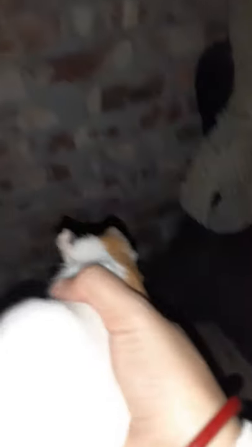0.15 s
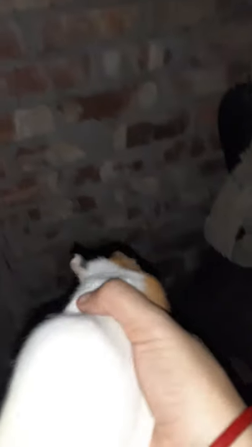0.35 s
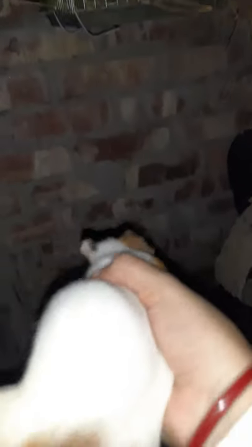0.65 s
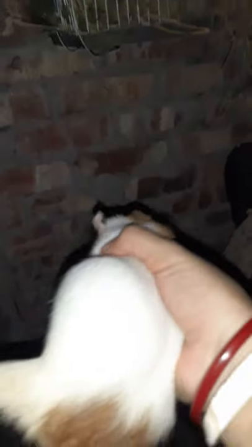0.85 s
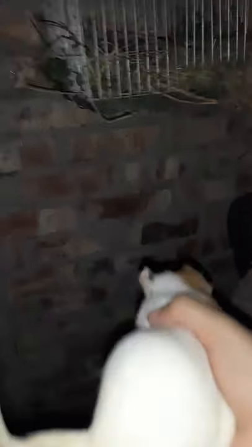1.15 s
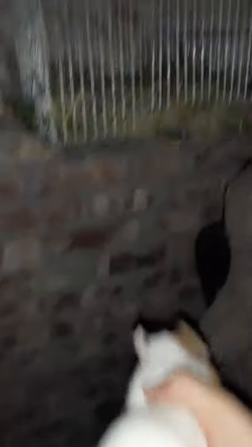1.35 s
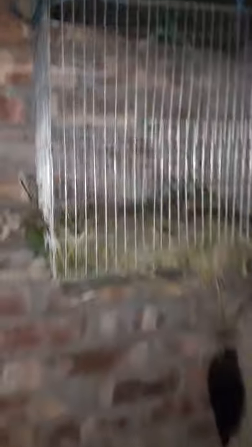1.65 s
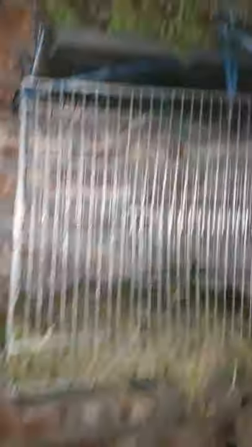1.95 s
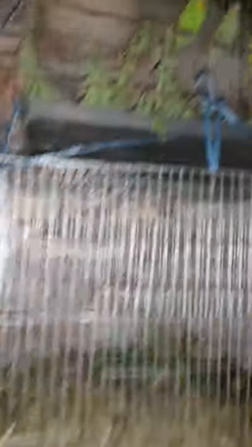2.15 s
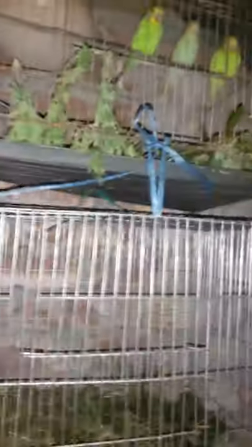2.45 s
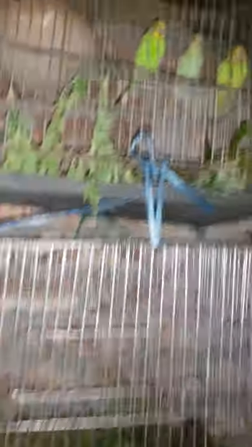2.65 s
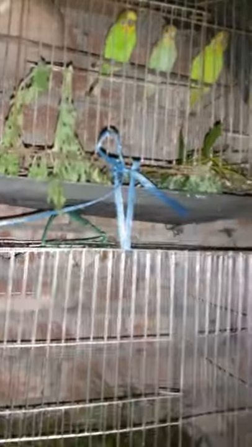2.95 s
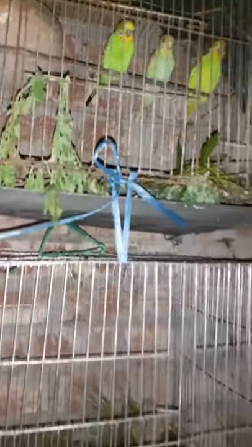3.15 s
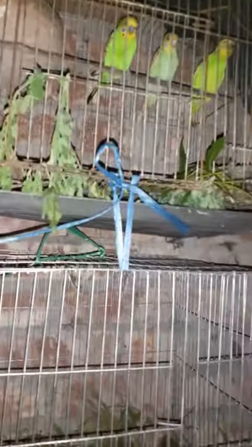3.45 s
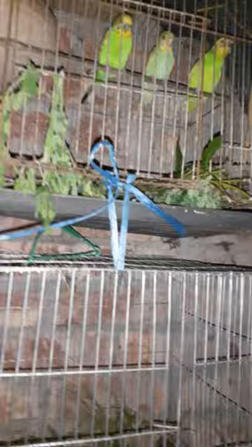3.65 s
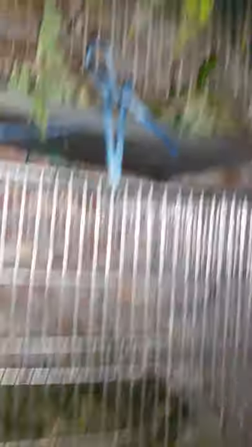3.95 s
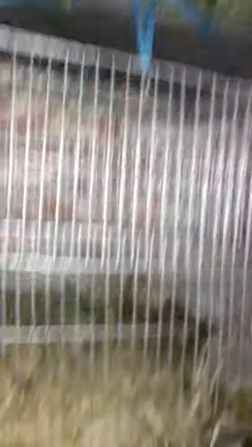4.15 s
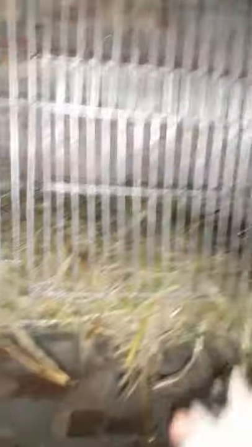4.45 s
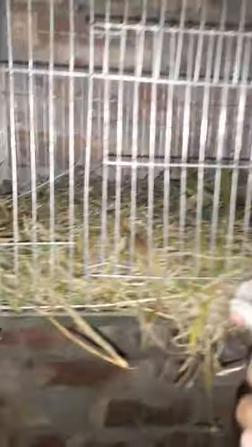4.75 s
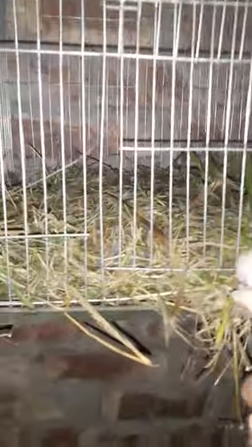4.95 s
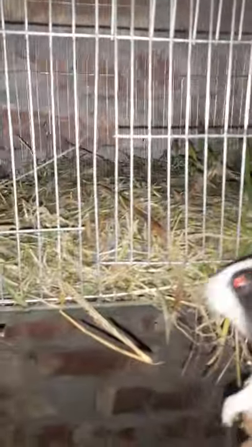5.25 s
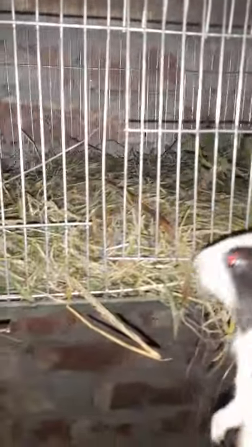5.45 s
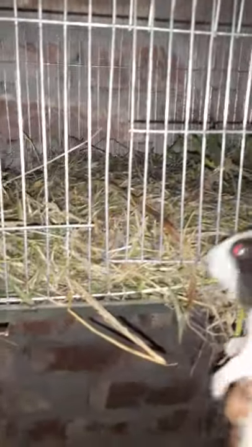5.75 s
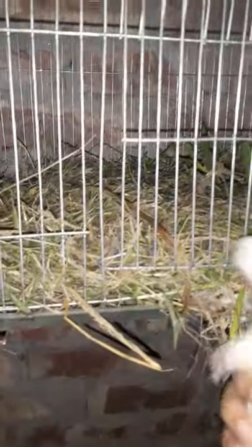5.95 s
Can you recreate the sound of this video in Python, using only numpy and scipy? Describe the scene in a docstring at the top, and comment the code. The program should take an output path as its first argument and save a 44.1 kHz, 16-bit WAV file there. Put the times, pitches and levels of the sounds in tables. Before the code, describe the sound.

A guinea pig very close to a phone in a small brick room gives several loud, piercing squeals, some rough and splitting. It then calms to regular soft calls, each a low grunt flicking up into a thin whistle. A faint motor-like hum drops in pitch midway. Soft handling thuds and small rustles follow, a fainter call comes from farther off, and a hard squeal ends it.

```python
"""A guinea pig, held in a hand close to a phone with two microphones in a small brick room, squeals,
calms to softer calls and squeals again near the end. Most calls open with a low grunt, a pulsed note that
dips and shoots up into a whistle of a few harmonics with air hiss; hard squeals split into subharmonics.
Behind it a faint hum of steady partials sags in pitch over dull room noise and an early drone. Sine thuds
are soft handling bumps, grainy noise is a little rustling, and one call from farther off comes via the room."""
import sys
import numpy as np
from scipy import signal
from scipy.fft import rfft, irfft, next_fast_len
from scipy.io import wavfile
from scipy.ndimage import uniform_filter1d, minimum_filter1d

SR = 44100
rng = np.random.default_rng(int(sys.argv[2]) if len(sys.argv) > 2 else 0)


def output_pcm(signal):
    """Save a mono or channel-first signal as 16-bit PCM at the path in sys.argv[1].

    Samples are clipped to [-1, 1] before scaling.
    """
    pcm = np.clip(np.atleast_2d(signal).T, -1, 1) * 32767
    wavfile.write(sys.argv[1], SR, np.round(pcm).astype(np.int16))


N = 269451
TIME = np.arange(N) / SR


def amp(db):
    """Decibels to gain."""
    return 10 ** (np.asarray(db) / 20)


def unit(x):
    """Scales to rms 1."""
    return x / np.sqrt(np.mean(x ** 2) + 1e-20)


def read(points, hz):
    """Reads a spectrum on a log-frequency axis."""
    f, value = np.transpose(points)
    return np.interp(np.log(hz + 1), np.log(f + 1), value)


def colour(x, gain):
    """Filters x by a gain given as a function of frequency."""
    size = next_fast_len(x.shape[-1] + 2048)
    spectrum = rfft(x, size) * gain(np.fft.rfftfreq(size, 1 / SR))
    return irfft(spectrum, size)[..., :x.shape[-1]]


def noise(spectrum, count):
    """Noise of rms 1 with the given spectrum."""
    return unit(colour(rng.standard_normal(count), lambda f: amp(read(spectrum, f))))


def wobble(count, hz):
    """Slow chance of rms 1, up to about hz."""
    return unit(colour(rng.standard_normal(count), lambda f: np.exp(-(f / hz) ** 2)))


def gate(t, start, end, rise, fall):
    """Smooth opening and closing of a sound."""
    opening = np.minimum((t - start) / rise, (end - t) / fall)
    return np.sin(np.pi / 2 * np.clip(opening, 0, 1)) ** 2


def add(mix, s, sound):
    """Adds a sound into the mix at time s."""
    part = mix[max(round(s * SR), 0):][:len(sound)]
    part += sound[:len(part)]


def partial(hz, k):
    """Harmonic k of a pitch curve as a sine of rms 1, fading out between 16.5 and 18 kHz."""
    audible = np.clip((18000 - k * hz) / 1500, 0, 1)
    phase = k * np.cumsum(hz) / SR + rng.random()
    return np.sqrt(2) * np.sin(2 * np.pi * phase) * audible


# Partials of the hum. Each row: multiple of the pitch, relative level in dB.
HUM_PARTIALS = [(1, -2.5), (1.5, -19), (2, -23.5), (3, -25.5)]
# Colour of the early drone. Each row: frequency in Hz, relative level in dB.
DRONE_COLOUR = [(150, -34), (270, -9), (330, -6), (400, -12.5), (700, -31)]
# Colour of the room noise. Each row: frequency in Hz, relative level in dB per Hz.
ROOM_NOISE_COLOUR = [(15, -35.5), (25, -14.5), (55, -8), (100, -3), (130, -0.5), (160, -14), (320, -17),
                     (450, -20.5), (800, -24), (1600, -28.5), (3200, -34.5), (4300, -42.5), (6000, -44.5),
                     (16000, -65.5)]
# Likeness of the room noise at both microphones. Each row: frequency in Hz, left-right likeness.
ROOM_NOISE_LIKENESS = [(30, 0.98), (200, 0.75), (600, 0.89), (1500, 0.14), (15000, .1)]
HUM_FAST_HZ, HUM_SLOW_HZ = 124.4, 93.6
HUM_FAST_DB, HUM_SLOW_DB = -52.5, -46
HUM_SLOWS_AT_S, HUM_SLOWING_S = 3.42, .26
DRONE_DB, DRONE_END_S, DRONE_RISE_S, DRONE_FADE_S = -59, 2.6, 0.54, 1
ROOM_NOISE_DB = -53.5


def background():
    """A distant motor-like hum that slows and grows midway, over dull room noise and a low drone."""
    slowed = np.clip((TIME - HUM_SLOWS_AT_S) / HUM_SLOWING_S, 0, 1)
    hz = (HUM_FAST_HZ + (HUM_SLOW_HZ - HUM_FAST_HZ) * slowed) * (1 + .004 * wobble(N, 8))
    level_db = HUM_FAST_DB + (HUM_SLOW_DB - HUM_FAST_DB) * slowed + 0.822 * wobble(N, 4.6)
    hum = amp(level_db) * sum(amp(db) * partial(hz, k) for k, db in HUM_PARTIALS)
    hum = hum * amp([[-.8], [.8]])  # a little stronger on the right
    drone_gate = gate(TIME, 0, DRONE_END_S, DRONE_RISE_S, DRONE_FADE_S)
    drone = amp(DRONE_DB) * drone_gate * noise(DRONE_COLOUR, N)
    left, other = noise(ROOM_NOISE_COLOUR, N), noise(ROOM_NOISE_COLOUR, N)
    alike = lambda f: np.clip(read(ROOM_NOISE_LIKENESS, f), -1, 1)
    right = colour(left, alike) + colour(other, lambda f: np.sqrt(1 - alike(f) ** 2))
    swell_db = 1.3 * wobble(N, 6)
    return hum + drone + amp(ROOM_NOISE_DB + swell_db) * np.array([left, right])


# Colour of the air hiss in the calls. Each row: frequency in Hz, relative level in dB.
AIR_COLOUR = [(500, -27), (1500, -28.5), (2700, -29.5), (4000, -15.5), (4800, -18.5), (5500, -12.5),
              (6400, -4), (8500, -2), (10200, -3.5), (12000, -9.5), (13600, -10.5), (15000, -2.5),
              (16000, -21)]


def whistling(hz, first_db, octave_db, upper_db, hiss_db, shimmer_db=1.07, rolloff_db=-5):
    """A thin, high tone with strong overtones and air rushing past the folds."""
    count = len(hz)
    turbulence = np.clip(amp(hiss_db - np.maximum(first_db, octave_db)) - .06, 0, .3)
    # strong turbulence shakes the pitch; a clean whistle barely wavers
    fast_shake = (.0004 + .015 * turbulence) * wobble(count, 350)
    slow_shake = (.001 + .012 * turbulence) * wobble(count, 50)
    hz = hz * (1 + fast_shake + slow_shake)
    levels = [first_db, octave_db, upper_db, upper_db + rolloff_db, upper_db + 2 * rolloff_db]
    tone = sum(amp(db + shimmer_db * wobble(count, 70)) * partial(hz, k)
               for k, db in enumerate(levels, 1))
    gusts = amp(hiss_db - 2 + 2 * wobble(count, 150))
    return tone + gusts * noise(AIR_COLOUR, count)


def squeak(start, length, first_hz, last_hz, bend, swell, db, octave_db, upper_db, hiss_db):
    """A soft whistle that swells, glides to its last pitch and lets go."""
    t = np.arange(0, length, 1 / SR)
    glide_hz = last_hz + (first_hz - last_hz) * (1 - t / length) ** bend
    hz = glide_hz * (1 + .003 * wobble(len(t), 60))
    tone = whistling(hz, db, db + octave_db, db + upper_db, hiss_db, shimmer_db=1.5)
    return start, tone * gate(t, 0, length, swell * length, fall=.018)


# Colour of the lines between the harmonics. Each row: frequency in Hz, relative level in dB.
SPLIT_COLOUR = [(300, -76.5), (1250, -45), (2050, -22), (2550, -10), (3400, -23), (4500, -30.5),
                (5000, -13), (6200, -6), (7200, -2), (8750, -9), (10100, -10.5), (12500, -17),
                (14300, -6.5), (15800, -33.5)]


def split_folds(t, hz, start, end, count, db, smear_hz, lift_db):
    """The folds repeat only every few cycles: lines between the harmonics, smeared as the pattern slips."""
    count = round(count)
    lines = np.zeros(len(t))
    for k in range(1, 4 * count):
        if k % count:  # skip the harmonics themselves
            slip_hz = np.sqrt(abs(smear_hz) * 300) * wobble(len(t), 600)
            lines += partial(hz * k / count + slip_hz, 1)
    opening = gate(t, start - .004, end + .004, .009, .009)
    low_lift = lambda f: lift_db / (1 + (f / 3600) ** 8)
    lines = colour(lines * opening, lambda f: amp(read(SPLIT_COLOUR, f) + low_lift(f)))
    return amp(db) * unit(lines) * np.sqrt(np.mean(opening ** 2))


# Where the folds split. Each row: start in seconds, end in seconds, cycles per pattern, level in dB,
# smear setting in Hz (rms slip is the root of 300 times it), lift of the low lines in dB relative to the
# high ones, change of the overtones in dB.
FOLD_SPLITS = [(0.858, 0.913, 3, -14.5, 4, -11, 0.5), (0.91, 0.953, 3, -41, 1, 23, 2.5),
               (1.442, 1.529, 3, -34, 88, -1.5, -0.5), (1.537, 1.55, 3, -20.5, 30, -5.5, -5.5),
               (1.55, 1.646, 2, -12.5, 0.5, -5, -6.5), (5.764, 5.898, 3, -21, 220, 5.5, -0.5),
               (5.809, 5.911, 2, -22.5, 250, 5, -1), (5.898, 5.979, 2, -13.5, 3.8, 4, -7.5)]
YELP_S, HISS_FADE_DB = 0.0051, -18.5  # the opening yelp settles at once; the hiss fades over the squeal
# at the end the folds let go: the pitch drops in a puff of air
CLOSE_S, CLOSE_DROP_HZ, CLOSE_PUFF_DB, PUFF_RISE_DB_PER_S = .007, 200, -21, 703
FUNDAMENTAL_SHARE = 0.63  # the fundamental follows only this share of a squeal's level changes


def squeal(curve, first_db, overtones_db, bright_start_db, bright_end_db, hiss_db, yelp_hz, arch_hz):
    """A hard whistle: it snaps on, power moves from the octave to the third harmonic, and it ends in a puff."""
    s, pitch, level = np.transpose(curve)
    t = np.arange(s[0] - .005, s[-1] + CLOSE_S, 1 / SR)
    age = t - t[0]
    progress, closing = age / age[-1], np.clip((t - s[-1]) / CLOSE_S, 0, 1)
    hz = np.interp(t, s, pitch) + yelp_hz * np.exp(-age / YELP_S) - CLOSE_DROP_HZ * closing
    hz = hz + arch_hz * np.sin(np.pi * progress ** 2.1) ** 2
    level_db = np.interp(t, s, level)
    power_db, rasp = level_db + overtones_db, 0
    for start, end, *pattern, dip_db in FOLD_SPLITS:
        if s[0] < start < s[-1]:
            rasp = rasp + split_folds(t, hz, start, end, *pattern)
            power_db = power_db + dip_db * gate(t, start - .004, end + .004, .015, .015)
    bright_db = bright_start_db + (bright_end_db - bright_start_db) * progress
    # octave and third harmonic share the power
    octave_db = power_db - 10 * np.log10(1 + amp(bright_db) ** 2)
    puff_db = CLOSE_PUFF_DB - PUFF_RISE_DB_PER_S * (t[-1] - t)
    air_db = np.maximum(hiss_db + HISS_FADE_DB * progress, puff_db)
    fundamental_db = first_db + FUNDAMENTAL_SHARE * (level_db - level.max())
    tone = whistling(hz, fundamental_db, octave_db, octave_db + bright_db, air_db)
    return t[0], (tone + rasp) * gate(t, t[0], t[-1], .005, .002)


# Throat colour with the mouth shut. Each row: frequency in Hz, relative level in dB.
SHUT_MOUTH = [(400, -27), (700, 6.5), (1000, 3), (1400, -17), (2100, -11), (2800, -22), (3500, -32.5),
              (4600, -40), (8000, -97), (15000, -97)]
# Throat colour with the mouth open. Each row: frequency in Hz, relative level in dB.
OPEN_MOUTH = [(430, -4.5), (900, -5), (1400, -4), (1900, -12), (2800, -23), (4000, -19), (5400, -32),
              (7500, -19.5), (15000, -30)]
HOARSE_DB = 10  # rise of the huskiness over the sweep with the mouth shut; half of it when open


def grunt(start, hold, sweep, low_hz, end_hz, db, mouth, hiss_db,
          scoop=0.22, settle=.018, jitter=0.0088, strain=.03, fade_db=-11, press_db=4):
    """A pulsed note settles low, then sweeps up, hoarser, as the folds tighten; an open mouth adds half lines."""
    t = np.arange(0, hold + sweep, 1 / SR)
    count = len(t)
    tension = np.clip((t - hold) / sweep, 0, 1) ** (1.8 - .5 * mouth)
    effort = np.sqrt(tension)
    dip = 1 + scoop * (1 - .4 * mouth) * np.exp(-t / settle)
    hz = low_hz * dip * (end_hz / low_hz) ** tension
    hz = hz * (1 + (jitter + 0.01257 * mouth + strain * effort) * wobble(count, 300))
    throat = lambda f: amp((1 - mouth) * read(SHUT_MOUTH, f) + mouth * read(OPEN_MOUTH, f))
    orders = np.arange(1, 33) / 2
    halves = mouth ** 2 * (1 - tension) ** 3
    gains = np.array([throat(k * hz) * amp(press_db * effort * (k > 1)) * (halves if k % 1 else 1)
                      for k in orders])
    gains /= np.linalg.norm(gains, axis=0)
    # the fundamental holds nearly steady; the higher lines flutter
    tone = sum(g * amp(min(.6 * k * k, 3) * wobble(count, 120)) * partial(hz, k)
               for k, g in zip(orders, gains))
    husk = unit(colour(rng.standard_normal(count), lambda f: throat(f) * (f > low_hz)))
    tone += amp(-23.5 + 10 * mouth + HOARSE_DB * (1 - .5 * mouth) * effort) * husk
    tone *= amp(fade_db * (0.5 - .4 * mouth) * tension ** 0.36)
    hiss = unit(noise(AIR_COLOUR, count) * amp((20 - 11 * mouth) * effort))
    return start, (amp(db) * tone + amp(hiss_db - 3) * hiss) * gate(t, 0, t[-1], .015, .006)


# Soft squeaks close by. Each row: start in seconds, length in seconds, first pitch in Hz, last pitch in Hz,
# bend (over 1 glides early), swelling share 0-1, level in dB, octave against it in dB, third harmonic
# against it in dB, air hiss setting in dB (centred 2 dB lower).
NEAR_SQUEAKS = [(.306, .018, 5120, 4805, 1, 0.2, -14, -1.5, -7, -30),
                (1.391, 0.038, 3010, 3440, 1.33, 0.54, -40.5, 9.5, 4, -29),
                (1.946, 0.044, 3070, 3490, 1.85, 0.57, -39.5, -25, -18, -56),
                (1.972, 0.16, 3780, 4094, 2.7, 0.17, -51, -2, 5, -62.5),
                (2.896, .052, 2800, 3424, 3.3, 0.36, -38.5, -13, -25, -60),
                (3.307, 0.054, 2690, 3210, 3.5, 0.23, -37.5, -20.5, -20, -63.5),
                (3.74, 0.047, 2740, 3370, 2.76, 0.18, -38.5, -18, -24, -59),
                (3.783, 0.033, 3413, 3636, 1, 0.2, -34.5, -11, -18, -61),
                (3.858, 0.082, 4430, 4450, .8, 0.41, -46.5, -4.5, 2, -83),
                (3.911, 0.054, 4470, 3927, .35, 0.62, -23.5, -2.5, -25, -44),
                (4.324, 0.056, 2327, 3060, 1.5, 0.01, -43.5, -12.5, -12.5, -49),
                (4.368, 0.099, 3290, 3640, 1.86, 0.43, -51.5, 2.5, -4.5, -66),
                (4.475, 0.11, 3737, 3933, 1.03, 0.35, -45, -5.5, -7, -78),
                (5.638, 0.064, 2550, 2992, 4.6, 0.22, -32.5, -27, -15.5, -53),
                (5.689, 0.058, 2750, 3370, 1.3, 0.45, -32.5, -12.5, -5, -45)]
# The four loud squeals, one curve each. Each row of a curve: time in seconds, base pitch in Hz,
# level setting in dB that the overtones are offset from.
SQUEAL_PATHS = [
    [(0.316, 4370, -17.5), (0.366, 4398, -15), (0.398, 4423, -25.5), (0.55, 4406, -16), (0.553, 4400, -20)],
    [(0.815, 3220, -28.5), (0.833, 3357, -14.5), (0.859, 3692, -19.5), (0.921, 3792, -9),
     (0.999, 4117, -13.5), (1.113, 4189, -12)],
    [(1.432, 3950, -24.5), (1.448, 3790, -19), (1.5, 3680, -14.5), (1.542, 3809, -12.5), (1.6, 4150, -13),
     (1.644, 4100, -17), (1.652, 4145, -16)],
    [(5.743, 3564, -15.5), (5.765, 3615, -15.5), (5.903, 4007, -15), (5.955, 4105, -14.5),
     (5.996, 4133, -19)],
]
# Voice of each squeal. Each row: fundamental at its loudest in dB, overtones against the level curve in dB,
# third harmonic over the octave at the start in dB and at the end in dB, air hiss setting at the start in dB
# (centred 2 dB lower), opening yelp in Hz, arch of the pitch in Hz.
SQUEAL_TONES = [(-27, 7.5, 3, 7.5, -29, 101, 32.5), (-25.5, 0.5, -3.5, 4.5, -32.5, -0.5, -3.5),
                (-28.5, 1, -5, -0.5, -32.5, 0.5, 4), (-26.5, 0, -21, 3.5, -24.5, 199.5, 1.5)]
# Grunts close by. Each row: start in seconds, hold in seconds, sweep in seconds, lowest pitch in Hz,
# end pitch in Hz, level before the sweep in dB, mouth opening 0-1, air hiss setting in dB (played 3 dB lower).
NEAR_GRUNTS = [(.728, 0.032, 0.056, 914, 2560, -35, 0.79, -34.5),
               (1.267, 0.046, 0.085, 864, 3104, -36.5, 0.95, -44),
               (1.823, 0.055, 0.072, 849, 2890, -38.5, 0.91, -67),
               (2.309, 0.05, 0.088, 749, 2507, -39.5, 0, -62),
               (2.768, 0.073, 0.058, 682, 2613, -39.5, 0.1, -61),
               (3.186, 0.059, 0.069, 664, 2700, -39.5, 0.22, -63),
               (3.622, .06, 0.069, 639, 2750, -40, 0.07, -62),
               (4.183, 0.05, 0.087, 643, 2320, -37.5, 0.01, -64),
               (4.743, 0.084, 0.069, 686, 2400, -40.5, 0.3, -66.5),
               (5.564, 0.014, 0.071, 722, 2602, -42, 0.4, -63.5)]


def guinea_pig():
    """All squeaks, squeals and grunts of the near animal."""
    voice = np.zeros(N)
    for row in NEAR_SQUEAKS:
        add(voice, *squeak(*row))
    for curve, row in zip(SQUEAL_PATHS, SQUEAL_TONES):
        add(voice, *squeal(curve, *row))
    for row in NEAR_GRUNTS:
        add(voice, *grunt(*row))
    return voice


# Soft handling bumps at the phone. Each row: middle in seconds, peak level in dB.
HAND_BUMPS = [(.85, -41), (1.031, -48.5), (2.218, -41), (2.579, -44), (5.027, -40), (5.328, -48)]


def bumps(hz=98, length=.09):
    """The hand nudges the phone: a few cycles of low thud."""
    out, t = np.zeros(N), np.arange(0, length, 1 / SR)
    thud = np.hanning(len(t)) * np.sin(2 * np.pi * hz * t)
    for s, db in HAND_BUMPS:
        add(out, s - length / 2, amp(db) * thud)
    return out


# Rustles of fur, cloth and hay close by. Each row: start in seconds, length in seconds, level in dB,
# treble lift in dB (approached far above 4 kHz, half of it there).
SWISHES = [(2.578, 0.057, -64, 9), (3.866, 0.017, -61, 30), (3.973, 0.024, -45.5, 61.5),
           (4.242, 0.12, -43.5, -21), (4.34, 0.55, -61.5, -3), (4.561, 0.047, -50, 26),
           (4.88, 0.7, -61, -11.5), (5.217, 0.016, -55, 9)]
# Colour of the rustles before that lift. Each row: frequency in Hz, relative level in dB.
SWISH_COLOUR = [(100, -5.5), (300, -10.5), (550, 2.5), (800, -8), (1100, -7), (1600, -5), (3100, -3),
                (4300, -15.5), (8000, -19.5), (15000, -22)]


def rustles():
    """Short swishes: noise made grainy by fast, random level changes."""
    out = np.zeros(N)
    for s, length, db, lift_db in SWISHES:
        t = np.arange(0, length, 1 / SR)
        grains = noise(SWISH_COLOUR, len(t)) * amp(3.1 * wobble(len(t), 183))
        grains = colour(grains, lambda f: amp(lift_db * f / (f + 4000)))
        add(out, s, amp(db) * unit(grains * gate(t, 0, length, 0.067 * length, 0.57 * length)))
    return out


# The grunt of a call from farther off, one row with the columns of the near grunts.
DISTANT_GRUNT = (5.15, .12, .06, 570, 2700, -55, .45, -75)
# The squeak it rises into, one row with the columns of the near squeaks.
DISTANT_SQUEAK = (5.32, .09, 2850, 3850, 1.5, .2, -58, -14, -22, -75)


def far_call():
    """One grunt rising into a squeak, some way off and heard only through the room."""
    voice = np.zeros(N)
    add(voice, *grunt(*DISTANT_GRUNT))
    add(voice, *squeak(*DISTANT_SQUEAK))
    return voice


# Decay of the room's tail. Each row: frequency in Hz, time to fall by 60 dB in seconds.
TAIL_DECAY = [(200, .3), (1000, .3), (4000, .45), (8000, .38), (15000, .28)]


def room(x):
    """Brick walls: a quick cluster of near reflections, then a faint tail, different at each microphone."""
    taps = rng.standard_normal((2, SR // 2)) * (rng.random((2, SR // 2)) < .15)
    taps[:, :90] = 0  # about 2 ms before the first reflection
    hz, t, z = signal.stft(taps, SR, nperseg=256)
    cluster = 3.5 * np.exp(-t / .016)
    decay = amp(-60 * t / read(TAIL_DECAY, hz)[:, None]) + cluster
    tail = signal.istft(z * decay, SR, nperseg=256)[1]
    return signal.fftconvolve(x[None], tail / np.linalg.norm(tail[0]), axes=1)[:, :N]


# Level balance of the two microphones. Each row: frequency in Hz, left minus right in dB.
MIC_BALANCE = [(200, 2.5), (700, 3.5), (2400, 10), (4400, -0.5), (6200, -8), (7600, 0.5), (9000, 1),
               (15000, -1)]
# Phase between the two microphones. Each row: frequency in Hz, radians by which the left leads.
MIC_PHASE = [(0, 0), (700, .3), (1300, .4), (1900, -2), (2600, -3.7), (4100, -7.1), (6200, -11),
             (7600, -12.2), (15000, -24.6)]


def microphones(x):
    """The near sound reaches the two ports with different level and delay."""
    right_shift = lambda f: np.exp(-1j * np.interp(f, *np.transpose(MIC_PHASE)))
    left = colour(x, lambda f: amp(read(MIC_BALANCE, f) / 2))
    right = colour(x, lambda f: amp(-read(MIC_BALANCE, f) / 2) * right_shift(f))
    return np.array([left, right])


def scene(room_db=-12.5):
    """The near animal and rustles, their room with the far call, the bumps and the background."""
    near = guinea_pig() + rustles()
    reverb = room(amp(room_db) * near + far_call())
    return microphones(near) + reverb + bumps() + background()


def record(dry):
    """The phone rounds off the highest peaks with a quick limiter, then cuts the treble above 15.75 kHz."""
    peak = -minimum_filter1d(-abs(dry).max(0), 441)  # highest peak within 10 ms
    limited = dry / uniform_filter1d(np.maximum(peak / .92, 1), 441)
    lowpass = signal.firwin(301, 15750, window=("kaiser", 8), fs=SR)
    return signal.oaconvolve(limited, lowpass[None], "same", axes=1)


dry = scene()
out = record(dry)
output_pcm(out)
```